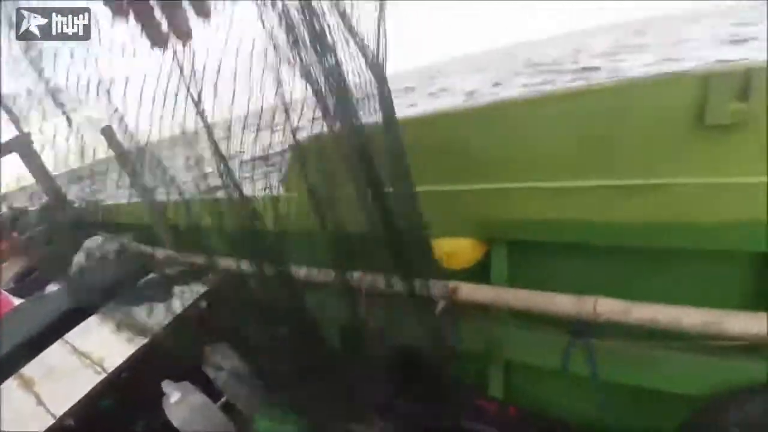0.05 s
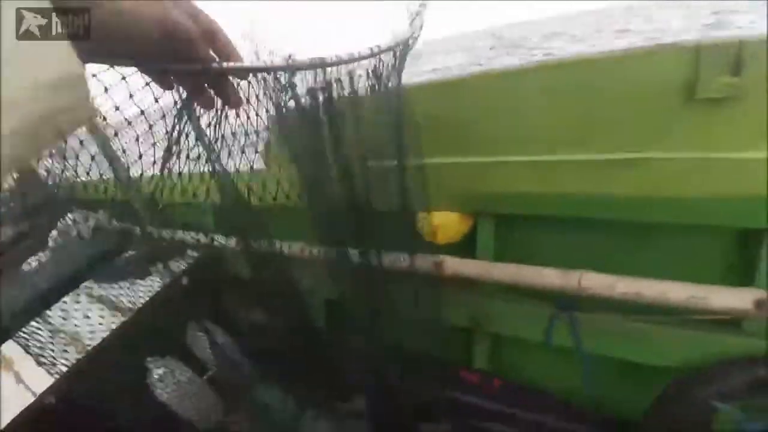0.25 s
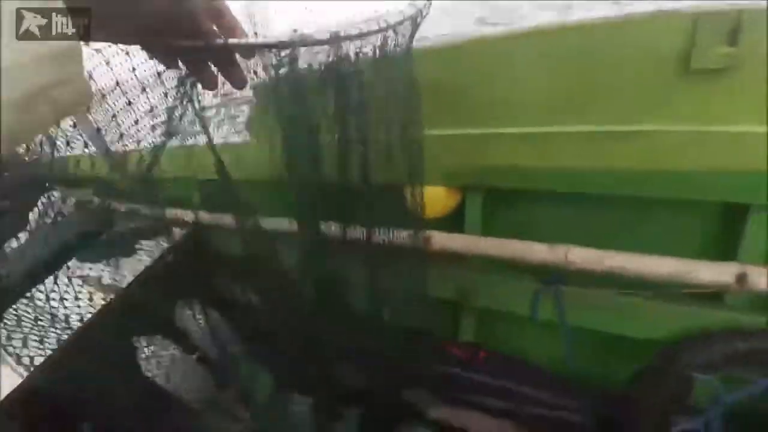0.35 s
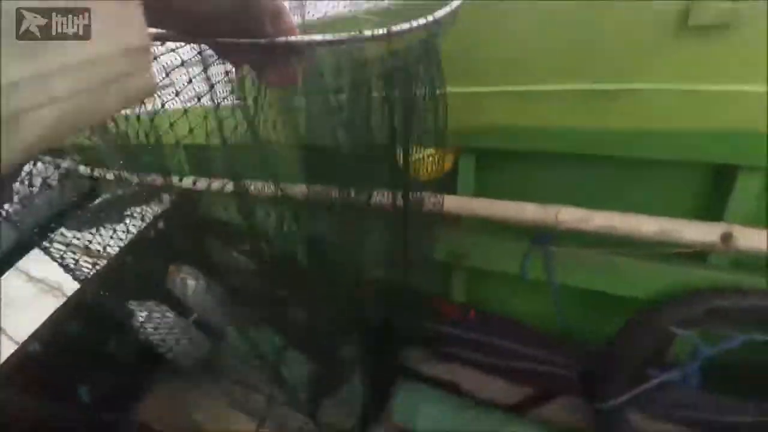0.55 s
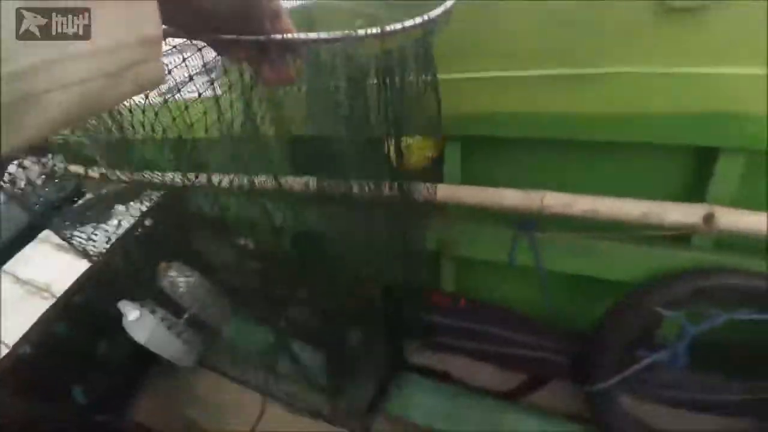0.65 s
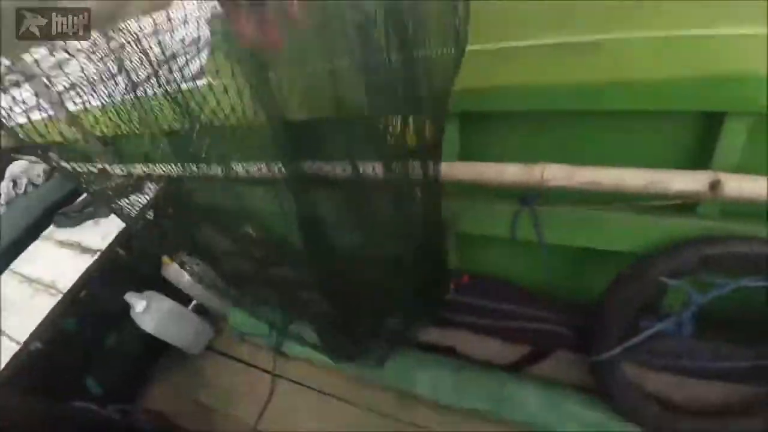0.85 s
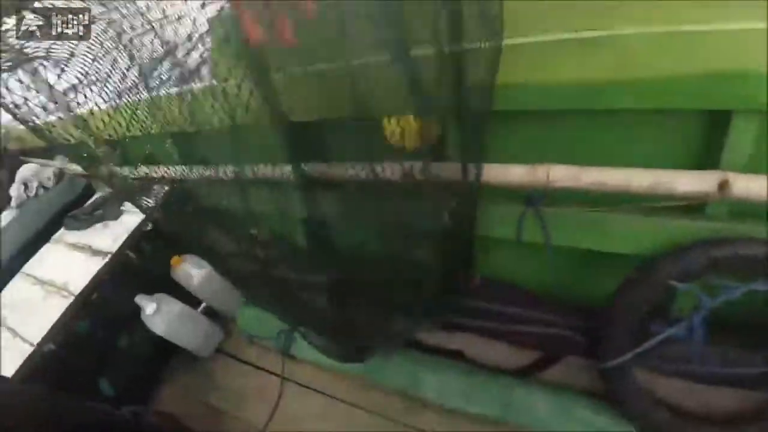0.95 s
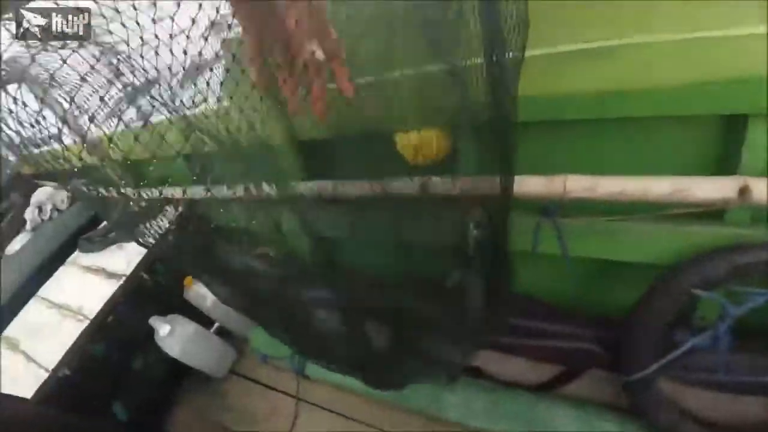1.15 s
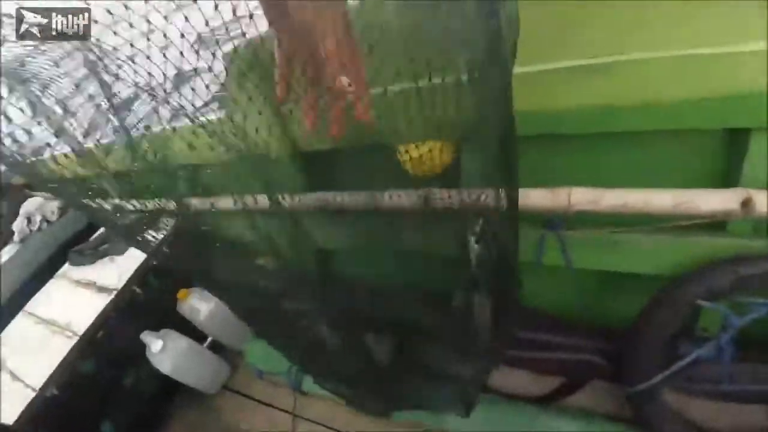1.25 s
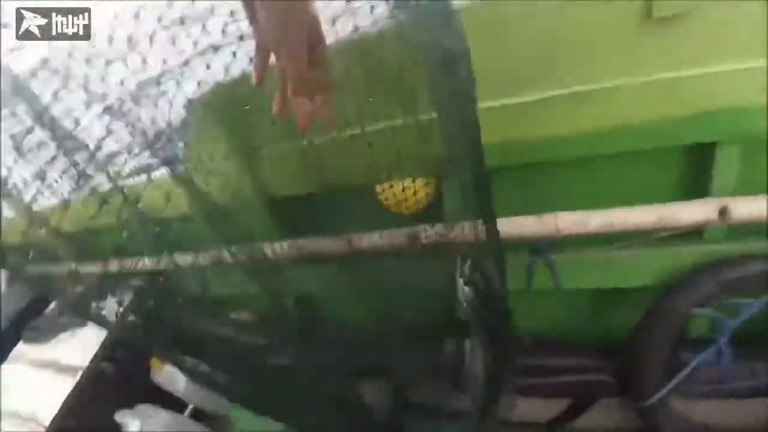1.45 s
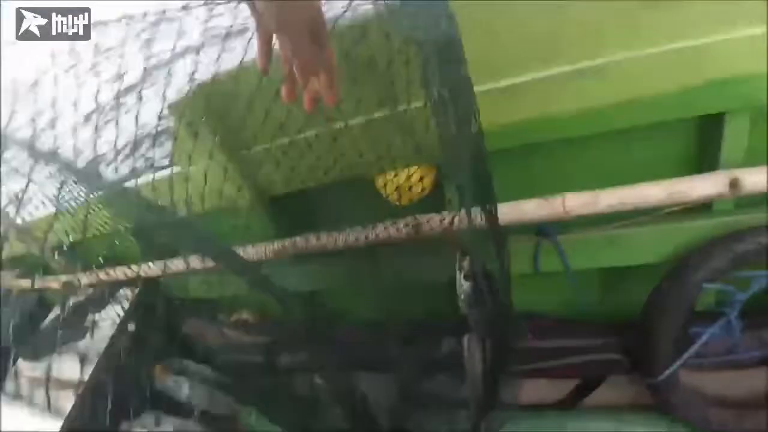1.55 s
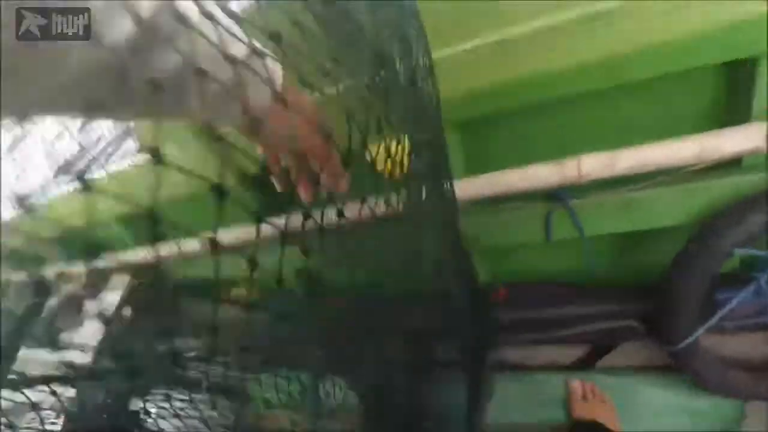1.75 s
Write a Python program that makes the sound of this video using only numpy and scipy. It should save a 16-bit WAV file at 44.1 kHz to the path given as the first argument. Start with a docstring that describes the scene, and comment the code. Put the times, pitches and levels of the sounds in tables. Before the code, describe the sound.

A fish thrashes in a landing net, knocking hard on a hollow boat hull amid wind

```python
"""Fish in a landing net

A fish thrashes in a landing net on a small boat at sea, heard close by for 1.8 s in one channel.
Struck modes make the net frame's knocks on the rail, the hull's boom and the fish's deck thuds.
Shaped noise makes the swishing, dragging and flicking wet mesh and the dull writhing on the hull;
narrow resonances make its zip over the hoop, short pulses the taps, gliding sines the low rumbles.
Wind buffets the microphone and puffs at it in rounded pulses over a faint wash of water,
and the hardest knock overloads it.
"""
import sys
import numpy as np
from scipy import signal
from scipy.fft import rfft, irfft
from scipy.io import wavfile
from scipy.ndimage import uniform_filter1d

SR = 44100
rng = np.random.default_rng(int(sys.argv[2]) if len(sys.argv) > 2 else 0)


def transcribe(signal):
    """Save signal, clipped to [-1, 1], as a 16-bit WAV file at the path in sys.argv[1]."""
    frames = np.atleast_2d(signal).T
    limited = np.clip(frames, -1, 1)
    pcm = np.round(limited * 32767).astype(np.int16)
    wavfile.write(sys.argv[1], SR, pcm)


N = 79380  # samples, 1.8 s

# Every *_TONE table is a noise spectrum: frequency_hz, relative density_db (per Hz).
# Wash of water around the boat
SEA_TONE = [(30, 7.5), (200, -11), (500, -8.5), (1000, -2.5), (2000, -48), (4000, -91), (8000, -26),
            (15000, -34.5)]
SEA_DB = -59.5

# Wind strength at the microphone: time_s, level_db
WIND_LEVEL = [(0, -40), (.16, -50), (.24, -19), (.33, -29), (.44, -38), (.53, -28), (.625, -33.5),
              (.71, -28.5), (.85, -21.5), (.92, -29), (.97, -18), (1.07, -17), (1.11, -30), (1.25, -20.5),
              (1.35, -29.5), (1.42, -18.5), (1.54, -34.5), (1.64, -26), (1.7, -30.5), (1.8, -28.5)]
# Spectrum of the buffeting: frequency_hz, density_db
WIND_TONE = [(8, 9), (25, 7.5), (45, 1), (80, -7), (130, -9), (200, -18.5), (350, -27.5), (700, -50),
             (2000, -71.5)]

# Mesh sliding on itself: time_s, level_db
SWISH_LEVEL = [(0, -61), (.09, -57.5), (.14, -57.5), (.2, -57), (.33, -63), (.5, -71), (.7, -65.5),
               (.82, -61.5), (.91, -65.5), (1.04, -61.5), (1.1, -64), (1.24, -59.5), (1.35, -66),
               (1.53, -64.5), (1.59, -56), (1.645, -56), (1.69, -59), (1.775, -57.5), (1.8, -60)]
# Spectrum of the swish: frequency_hz, density_db
SWISH_TONE = [(800, -2.5), (2000, 2), (3300, -1), (3900, 0.5), (4500, -3), (7500, -8), (11000, -13.5),
              (15000, -17)]
SWISH_GRAINS_PER_S, SWISH_SPREAD_DB = 6700, 2

# Net dragging over the boards: time_s, level_db
DRAG_LEVEL = [(0, -52.5), (.04, -42), (.09, -53), (.13, -45.5), (.19, -52.5), (.3, -51.5), (.45, -54.5),
              (.51, -55), (.57, -56), (.72, -48.5), (.86, -45.5), (.91, -73), (1.04, -52), (1.12, -48),
              (1.25, -49.5), (1.34, -53), (1.44, -46.5), (1.49, -53), (1.73, -55.5), (1.78, -43),
              (1.8, -44)]
# Spectrum of the drag: frequency_hz, density_db
DRAG_TONE = [(80, 6.5), (250, 6.5), (550, 2), (1000, -7), (2000, -17), (3500, -28), (8000, -47)]
DRAG_FLUTTER_DB, DRAG_FLUTTER_S = 2.5, 0.02  # spread of the catches, time between them

# Mesh running over the hoop: time_s, hoop_ring_db, zip_db, zip_pitch_hz
HOOP_RUN = [(0, -69, -56.5, 3880), (0.023, -48.5, -80, 3980), (0.061, -61.5, -66, 3810),
            (0.099, -61, -63.5, 3670), (0.137, -49, -56.5, 3890), (.165, -49.5, -86, 4000),
            (0.201, -47, -75, 4000), (.26, -92, -93, 3900)]
# Hoop resonances: frequency_hz, width_hz, relative level_db
HOOP_MODES = [(635, 110, 0), (970, 110, -2.5), (1440, 170, -4.5), (1755, 220, -7.5), (2184, 350, -6.5)]
ZIP_WIDTH_HZ = 310

# Knocks of the net frame on the rail: start_s, boom_db, clack_db, clack_pitch_hz, clack_t60_s, crack_db
KNOCKS = [(0.019, -36, -36, 655, 0.038, -49), (0.2131, -1.5, -8.5, 930, 0.031, -20),
          (0.224, -38, -31.5, 980, 0.028, -29), (0.2298, -22.5, -22, 930, 0.028, -59),
          (0.602, -38, -59, 1170, 0.023, -49), (0.7356, -32, -32.5, 930, 0.021, -40),
          (0.742, -41, -30.5, 860, 0.037, -49), (0.7799, -27.5, -33.5, 944, 0.019, -44),
          (0.831, -38, -38.5, 576, 0.021, -69), (1.2067, -22.5, -32.5, 1053, 0.027, -35),
          (1.381, -42, -45, 1940, 0.027, -48), (1.447, -33.5, -33, 1240, 0.0093, -71)]
# Rail modes: multiple of the clack pitch (ratio), level_db, share of the clack t60 (ratio)
RAIL_MODES = [(.8, -14, .8), (1, 0, 1), (1.1, -10, 1.1), (1.5, -15, 1), (1.9, -19, .7), (2.45, -26, .8)]
# Spectrum of the crack: frequency_hz, density_db
CRACK_TONE = [(300, 5), (1500, 9.5), (3000, -5.5), (5500, -12.5), (7900, -17.5), (9500, -23), (15000, -29)]
RAIL_RISE_S, CRACK_RISE_S, CRACK_T60_S = .0004, .0006, .05
SLAP_DB, SLAP_T60_S, SLAP_OCTAVES = -21, 0.064, 0.45  # level against the clack, decay, spread

# Main hull modes: frequency_hz, level_db, t60_s
HULL_MODES = [(107, -12, 0.28), (205.4, -1.5, 0.1), (250, -1.5, 0.085), (273.4, -1.5, 0.12),
              (340, -37, 0.047), (393.8, -14.5, 0.18), (500, -22, 0.07), (569.5, -19, 0.18),
              (601, -24.5, 0.17), (793, -32, 0.11), (826, -23.5, 0.11), (886, -9.5, 0.037),
              (950, -21, 0.094), (1367, -44, 0.2)]
HULL_DELAY_S, HULL_RISE_S = 0.001884, 0.0036
# Dense ringing of planks and gear: frequency_hz, density_db, t60_s
PLANKS = [(50.3, -22, 0.27), (129, 5, 0.4), (288, -4, 0.26), (560, -8.5, 0.21), (970, -18, 0.24),
          (1640, -23.5, 0.15), (3000, -41, 0.26), (8040, -57, 0.036)]
PLANKS_DB, PLANKS_RISE_S = -16, .01

# Thuds of the fish on the deck boards: start_s, level_db
THUDS = [(0.047, -41), (0.114, -34), (0.336, -38), (0.778, -21.5), (0.835, -28.5), (0.858, -28),
         (1.013, -28.5), (1.2147, -12.5), (1.24, -31), (1.312, -36.5), (1.38, -33), (1.776, -36)]
# Deck modes before detuning: frequency_hz, level_db, t60_s
DECK_MODES = [(266, 2.5, 0.082), (365, -13.5, 0.15), (433.6, -14.5, 0.21), (506, -21, 0.19),
              (571, -15, 0.15), (751, -28, 0.29), (945, -27.5, 0.17), (1038, -30, .11)]
DECK_RISE_S, DECK_DETUNE = 0.009, 0.023  # detune: largest fraction up or down

# Flicks and scuffs of wet mesh: start_s, level_db, t60_s, centre_hz
FLICKS = [(0.2175, -34, 0.011, 6100), (0.231, -58, .014, 6600), (0.268, -23, 0.13, 320),
          (0.272, -46, 0.063, 6270), (0.379, -49.5, 0.11, 1700), (0.378, -58.5, 0.061, 6840),
          (0.451, -59, 0.039, 3000), (0.495, -43, 0.21, 267), (0.548, -57, 0.035, 2170),
          (0.643, -42.5, 0.094, 490), (0.7344, -52.5, .04, 6000), (0.782, -51, 0.14, 1570),
          (0.795, -56.5, 0.094, 3470), (0.866, -49.5, 0.013, 5000), (0.971, -40, 0.033, 430),
          (1.158, -59, 0.028, 530), (1.21, -52, 0.043, 4460), (1.208, -40.5, 0.045, 1160),
          (1.221, -36, 0.2, 670), (1.265, -56, 0.028, 3500), (1.449, -50, 0.28, 1190),
          (1.569, -50.5, 0.066, 1150), (1.605, -59.5, 0.12, 7600), (1.638, -48.5, 0.11, 5060),
          (1.743, -53.5, 0.17, 2920), (1.776, -51.5, 0.043, 5000)]
FLICK_RISE_S, FLICK_OCTAVES = .001, 0.51

# Dry taps of the hoop and of knots in the mesh: centre_s, level_db, pitch_hz
TAPS = [(0.3735, -44, 3020), (0.382, -42.5, 2540), (0.7362, -20, 1060), (0.7825, -36, 1080),
        (0.868, -37.5, 1200), (1.2078, -42, 855), (1.211, -27.5, 740), (1.6444, -32, 5170)]
TAP_REBOUND = .9

# Low rumbling glides, as of water sloshing under the hull: start_s, length_s, level_db, from_hz, to_hz
RUMBLES = [(0.478, .09, -34.5, 117.8, 45.4), (0.646, .1, -24.5, 34.3, 109.5)]

# Bouts of writhing against the hull: start_s, length_s, level_db
WRITHES = [(0.693, 0.088, -37), (0.802, 0.097, -30.5), (0.949, 0.087, -43), (1.092, 0.17, -40),
           (1.219, 0.08, -30.5), (1.359, 0.12, -41.5)]
# Spectrum of the writhing: frequency_hz, density_db
WRITHE_TONE = [(50, -56), (130, 5.5), (250, -4.5), (420, -8.5), (600, -19), (1200, -43), (3000, -89)]

# Dull low puffs of wind at the microphone: centre_s, level_db, half_width_s
PUFFS = [(0.763, -11, 0.00092), (0.815, -20, 0.007), (0.844, -35, 0.0037), (0.863, -21.5, 0.0028),
         (0.957, -13, 0.0054), (0.9729, -12, 0.0023), (0.983, -15.5, 0.001), (1.026, -19.5, 0.0012),
         (1.05, -10, 0.004), (1.125, -19.5, 0.0028), (1.244, -16.5, 0.002), (1.162, -31, .0015),
         (1.379, -22, .0018), (1.389, -10.5, 0.003), (1.41, -23, 0.0018), (1.429, -22.5, 0.00092),
         (1.457, -22.5, 0.0036), (1.784, -29, 0.0011)]
PUFF_REBOUND, PUFF_BOOM_DB = 0.49, -33  # boom level against the puff

# Microphone: overload ceiling as a share of full scale, upper band edge in Hz
OVERLOAD, EDGE_HZ = .71, 15350


def amp(db):
    """Decibels to gain."""
    return 10 ** (np.asarray(db) / 20)


def unit(x):
    """Scales to rms 1."""
    return x / np.sqrt(np.mean(x ** 2) + 1e-20)


def read(points, hz, column=1):
    """Reads a table column on a log-frequency axis."""
    p = np.array(points)
    return np.interp(np.log(hz + 1), np.log(p[:, 0] + 1), p[:, column])


def level(points):
    """Gain over time from time_s, level_db points."""
    return amp(np.interp(np.arange(N) / SR, *np.transpose(points)))


def rise(t, rise_s):
    """Exponential approach to full strength, softening an onset."""
    return 1 - np.exp(-t / rise_s)


def colour(x, tone):
    """Gives x a spectrum, at rms 1."""
    gain = amp(read(tone, np.fft.rfftfreq(len(x), 1 / SR)))
    return unit(irfft(rfft(x) * gain, len(x)))


def noise(tone, size=N):
    """Coloured noise at rms 1."""
    return colour(rng.standard_normal(size), tone)


def splash(t, hz, octaves):
    """A band of spray around a centre pitch, bell-shaped in octaves, at rms 1."""
    bins = np.fft.rfftfreq(len(t), 1 / SR) + 1
    band = np.exp(-.5 * (np.log2(bins / hz) / octaves) ** 2)
    return unit(irfft(rfft(rng.standard_normal(len(t))) * band, len(t)))


def whistle(hz, width_hz):
    """Noise in one narrow resonance, fixed or gliding, at rms 1."""
    lowpass = signal.butter(2, width_hz / 2, fs=SR, output="sos")
    waver = signal.sosfilt(lowpass, rng.standard_normal((2, N)))
    phase = 2 * np.pi * np.cumsum(hz * np.ones(N)) / SR
    return unit(waver[0] * np.cos(phase) + waver[1] * np.sin(phase))


def pulse(u, rebound):
    """A rounded push with a rebound on either side; u is time in half widths."""
    return (1 - rebound * u ** 2) * np.exp(-.5 * u ** 2)


def ring(modes, t):
    """Struck modes: sines that each die away by 60 dB in their t60."""
    return sum(amp(db - 60 * t / t60) * np.sin(2 * np.pi * hz * t) for hz, db, t60 in modes)


def add(mix, start_s, sound):
    """Mixes a sound in at a time, cut at the end of the mix."""
    part = mix[max(round(start_s * SR), 0):][:len(sound)]
    part += sound[:len(part)]


def sea():
    """Faint steady wash of water: coloured noise."""
    return amp(SEA_DB) * noise(SEA_TONE)


def wind(steady_s=0.064):
    """Low buffeting at the microphone, evened out so that it follows the strength of the gusts."""
    eddies = noise(WIND_TONE)
    power = abs(uniform_filter1d(eddies ** 2, int(steady_s * SR)))
    return level(WIND_LEVEL) * eddies / np.sqrt(power + 1e-6)


def swish():
    """Wet mesh sliding: a dense scatter of random grains of uneven strength."""
    present = rng.random(N) < SWISH_GRAINS_PER_S / SR
    strength = amp(SWISH_SPREAD_DB * np.minimum(rng.exponential(1, N), 4))
    grains = rng.standard_normal(N) * strength * present
    return level(SWISH_LEVEL) * colour(grains, SWISH_TONE)


def drag():
    """Net dragging over the boards: dull noise whose level wavers as it catches."""
    steps = np.arange(N) / SR / DRAG_FLUTTER_S
    catches = np.interp(steps, np.arange(N), rng.standard_normal(N))
    return level(DRAG_LEVEL) * amp(DRAG_FLUTTER_DB * catches) * noise(DRAG_TONE)


def hoop_run():
    """Mesh running over the hoop rubs its resonances and zips at a gliding pitch."""
    t = np.arange(N) / SR
    at, *columns = np.transpose(HOOP_RUN)
    ring_db, zip_db, zip_hz = (np.interp(t, at, column) for column in columns)
    rub = unit(sum(amp(db) * whistle(hz, width_hz) for hz, width_hz, db in HOOP_MODES))
    return amp(ring_db) * rub + amp(zip_db) * whistle(zip_hz, ZIP_WIDTH_HZ)


def hull(t):
    """The hull's main modes, with the dense ring of planks building up more slowly behind them."""
    hz, at, spectrum = signal.stft(noise(PLANKS, size=len(t)), SR, nperseg=512)
    # each frequency band of the noise dies away at its own rate
    decay = amp(-60 * at / read(PLANKS, hz, column=2)[:, None])
    planks = signal.istft(spectrum * decay, SR, nperseg=512)[1][:len(t)]
    main = ring(HULL_MODES, t) * rise(t, HULL_RISE_S)
    return main + amp(PLANKS_DB) * planks * rise(t, PLANKS_RISE_S)


def knocks():
    """Each blow cracks, slaps and clacks the rail, and a moment later pushes the hull in so that it booms."""
    out, t = np.zeros(N), np.arange(SR // 2) / SR
    for start_s, boom_db, clack_db, hz, t60, crack_db in KNOCKS:
        modes = [(ratio * hz, db, share * t60) for ratio, db, share in RAIL_MODES]
        clack = ring(modes, t) * rise(t, RAIL_RISE_S)
        slap = amp(SLAP_DB - 60 * t / SLAP_T60_S) * splash(t, hz, SLAP_OCTAVES)
        crack_level = amp(crack_db - 60 * t / CRACK_T60_S) * rise(t, CRACK_RISE_S)
        crack = crack_level * noise(CRACK_TONE, size=len(t))
        add(out, start_s, amp(clack_db) * (clack + slap) + crack)
        add(out, start_s + HULL_DELAY_S, -amp(boom_db) * hull(t))  # minus: the hull moves inward
    return out


def thuds():
    """The fish lands solidly on the deck and sets the boards' modes ringing."""
    out, t = np.zeros(N), np.arange(SR // 2) / SR
    for start_s, db in THUDS:
        # each spot on the boards rings a little differently, in pitch and in decay
        spot = 1 + DECK_DETUNE * (2 * rng.random() - 1)
        add(out, start_s, amp(db) * ring(DECK_MODES, t * spot) * rise(t, DECK_RISE_S))
    return out


def flicks():
    """Single flicks and scuffs of wet mesh: decaying bands of noise."""
    out, t = np.zeros(N), np.arange(SR // 5) / SR
    for start_s, db, t60, hz in FLICKS:
        envelope = amp(db - 60 * t / t60) * rise(t, FLICK_RISE_S)
        add(out, start_s, envelope * splash(t, hz, FLICK_OCTAVES))
    return out


def taps():
    """Hoop and knots tap dryly: one short pulse each, narrower the higher the pitch."""
    t = np.arange(N) / SR
    return sum(amp(db) * pulse((t - centre_s) * np.sqrt(2) * np.pi * hz, TAP_REBOUND)
               for centre_s, db, hz in TAPS)


def rumbles():
    """Low rumbling sines, as of water sloshing under the hull, that swell, fade and glide in pitch."""
    out = np.zeros(N)
    for start_s, length_s, db, from_hz, to_hz in RUMBLES:
        u = np.arange(0, length_s, 1 / SR) / length_s
        phase = 2 * np.pi * np.cumsum(from_hz + (to_hz - from_hz) * u) / SR
        add(out, start_s, amp(db) * np.sqrt(np.sin(np.pi * u)) * np.sin(phase))
    return out


def writhes():
    """The fish writhes against the hull: dull noise that swells and fades."""
    out, t = np.zeros(N), np.arange(N) / SR
    for start_s, length_s, db in WRITHES:
        swell = np.sin(np.pi * np.clip((t - start_s) / length_s, 0, 1))
        out += amp(db) * swell * noise(WRITHE_TONE)
    return out


def puffs():
    """Dull low puffs of wind at the microphone: rounded pulses with a faint boom."""
    out, t = np.zeros(N), np.arange(N) / SR
    for centre_s, db, half_width_s in PUFFS:
        out += amp(db) * pulse((t - centre_s) / half_width_s, PUFF_REBOUND)
        add(out, centre_s, amp(db + PUFF_BOOM_DB) * hull(t[:SR // 2]))
    return out


def scene():
    """Boat, fish, net, wind and water in one channel."""
    water = sea() + rumbles()
    air = wind() + puffs()
    net = swish() + drag() + hoop_run() + flicks() + taps()
    fish = thuds() + writhes()
    return (water + air + net + knocks() + fish)[None]


def record(dry, low_hz=14):
    """The microphone: low cut, overload on the hardest knock, soft ends, then the band limit."""
    low_cut = signal.butter(1, low_hz, "high", fs=SR, output="sos")
    x = signal.sosfilt(low_cut, dry)
    x = x / (1 + (x / OVERLOAD) ** 8) ** (1 / 8)  # nearly linear up to a firm ceiling
    x = x * signal.windows.tukey(N, .004)
    band_limit = signal.firwin(511, EDGE_HZ, window=("kaiser", 9), fs=SR)
    return signal.oaconvolve(x, band_limit[None], "same")


dry = scene()
out = record(dry)
transcribe(out)
```